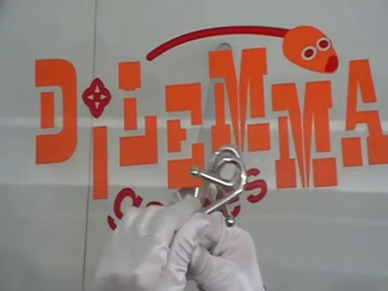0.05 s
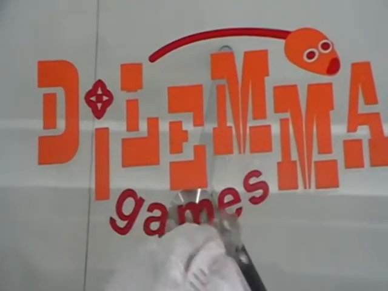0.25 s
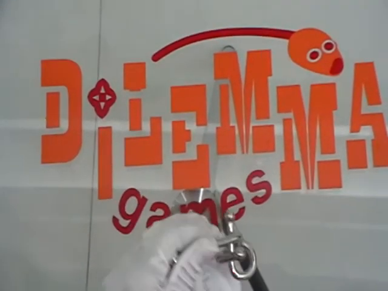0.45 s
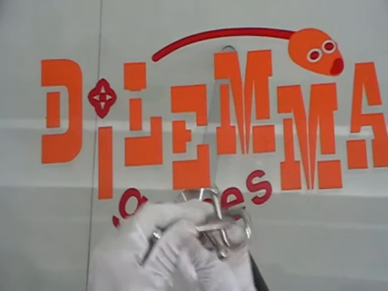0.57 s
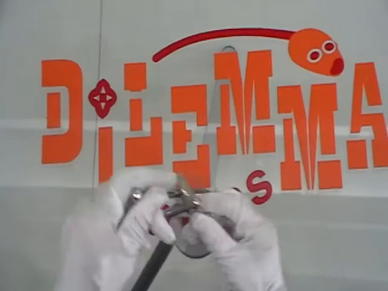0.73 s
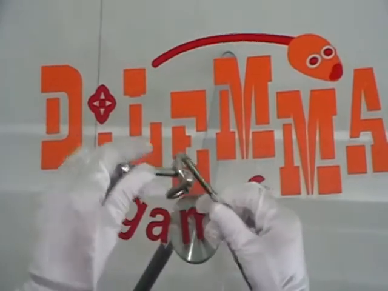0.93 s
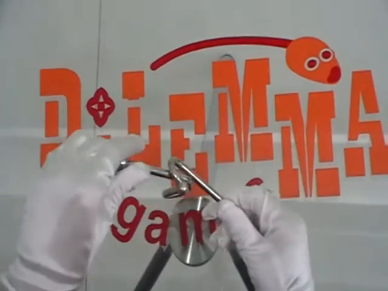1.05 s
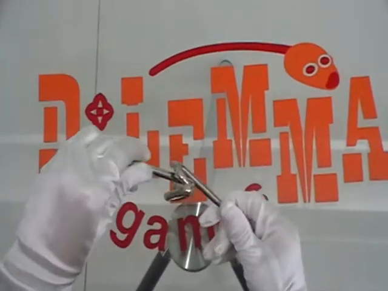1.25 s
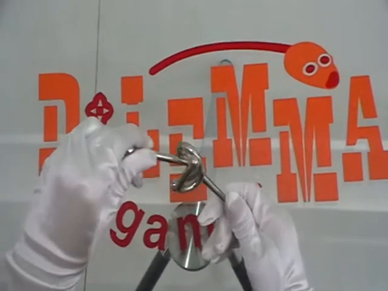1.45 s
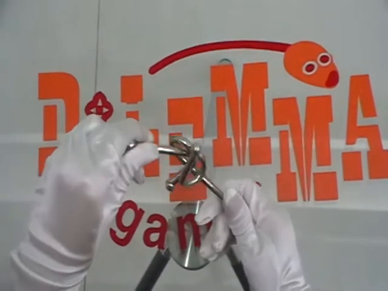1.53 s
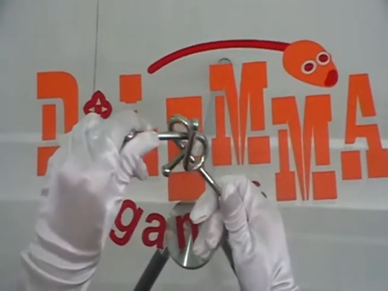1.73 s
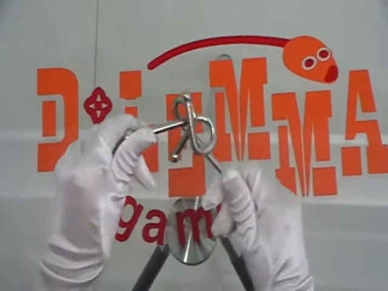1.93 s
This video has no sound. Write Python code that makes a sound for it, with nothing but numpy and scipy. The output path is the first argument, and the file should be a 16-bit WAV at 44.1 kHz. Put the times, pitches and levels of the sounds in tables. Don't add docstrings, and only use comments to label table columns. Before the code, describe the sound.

Two bent steel rods of a puzzle clink in gloved hands: a hard rattling knock, a second slightly softer one, then faint ticks and a soft slide, close stereo microphones, small live room, constant air-conditioner hiss.

```python
import sys
import numpy as np
from scipy import signal
from scipy.io import wavfile
from scipy.ndimage import uniform_filter1d

SR = 44100
rng = np.random.default_rng(int(sys.argv[2]) if len(sys.argv) > 2 else 0)


def wrap_up_sound(samples):
    columns = np.atleast_2d(samples).T
    tamed = np.clip(columns, -1, 1)
    steps = np.round(tamed * 32767).astype(np.int16)
    wavfile.write(sys.argv[1], SR, steps)


def volts(x):
    e = np.asarray(x, float) / 20
    return 10 ** e


N = 88200

# freq [Hz], density [dB per Hz]
AIR_SPECTRUM = [(500, -14), (590, -3), (850, -5), (1100, -8.5), (5000, -26), (8200, -39), (10700, -39),
                (16000, -46.5)]
# freq [Hz], density [dB per Hz]
DRONE_SPECTRUM = [(30, -46.5), (70, -33.5), (100, -6.5), (220, -2.5), (350, -8), (385, -7.5), (450, -10),
                  (500, -24)]
# pitch [Hz], width [Hz], level [dB]
FAN_LINES = [(50.07, 6, -70.5), (84, 8, -70.5), (115.3, 3.2, -61), (144.7, 8, -59), (171.3, 3.5, -59),
             (216.7, 19, -55), (280.3, 39, -55.5), (346, 15, -58.5)]
# freq [Hz], left-right likeness [0-1]
AIR_LIKENESS = [(60, 0.932), (180, 0.95), (550, 0.89), (1650, 0.72), (4970, 0.4), (15000, 0.67)]
# start [s], length [s], level [dB]
SLIDES = [
    (0.135, .06, -76),
    (.6, 0.11, -84),
    (1.43, 0.15, -69),
]
# start [s], force [dB], share of rod B [0-1], tilt [dB per octave], twist [dB]
CONTACTS = [(.1995, -11, 0.25, -4.5, -11), (.202, -11.5, 0.1, 1.5, 5.5), (.2045, -13.5, 0.5, 2, -2),
            (.208, -16, 0.23, -2, -4), (.211, -24.5, 0, 0.5, 3.5), (.2125, -21.5, 0, -2, -1.5),
            (.22, -27, 0, -5, -7), (.2235, -23, 0, -1, -7), (.2275, -16.5, 0.1, -0.5, -4),
            (.2408, -13.5, 0, 1, -2), (.2435, -29.5, .3, -0.5, -3), (0.2438, -30.5, 0.4, -1, -3.5),
            (.2495, -29.5, 0.2, 6.5, -5.5), (.2514, -16.5, 0, 9.5, -4), (.2545, -25, .3, -1, -2),
            (.2585, -24, 0.5, 10, -8), (.263, -15.5, 0.2, 7.5, -14), (0.6163, -57, 0.8, -8, -15),
            (.6995, -52, 0.5, -5, -14), (0.7242, -13.5, 1, 3, -11), (0.731, -22.5, 0.76, 9, -14.5),
            (.7385, -15, .9, -7, -9), (0.7455, -20.5, 0.85, -17, 0), (.7515, -19, 0.55, -7, -13),
            (.7545, -20, 1, 7.5, -2.5), (.759, -28.5, 0.9, 16, -1.5), (.7625, -30, 0.78, 3.5, 12.5),
            (1.164, -53.5, .6, -9, -12), (1.501, -64.5, 0.55, -6.5, -3.5), (1.52, -47, .85, -4, -10.5),
            (1.5805, -52, .8, 3.5, -19.5)]
ROD_A_HZ = [1985, 2950, 3334, 3425, 6471, 6545, 6908, 10375, 10575, 10638, 12453, 12614, 14822, 15105]
ROD_B_HZ = [2032, 2960, 3445, 4650, 6520, 6610, 6875, 10460, 10600, 10860, 12615, 14893, 15174, 15310]
# level [dB], t60 [s]
ROD_A_MODES = [(-19, 0.15), (-23, .15), (-17, .1), (-20, .18), (-8.5, .1), (0, .12), (-1, .12), (4, 0.16),
               (-2, .13), (5, .12), (0, .13), (-3.5, 0.14), (-6.5, .12), (-9, .13)]
# level [dB], t60 [s]
ROD_B_MODES = [(-25, 0.12), (-19.5, 0.32), (-21.5, .16), (-22, .1), (-8, .18), (-1.5, .12), (-10.5, .15),
               (-7, .15), (4, .12), (-13, 0.19), (-6, 0.18), (-5, .14), (-0.5, .1), (-10, .11)]
GRIPS_S = [0.2647, .65, 0.711, 0.76, .8, 1.17, 1.51, 1.53, 1.64]
# freq [Hz], level [dB]
CRACK_SPECTRUM = [(1500, -55.5), (3000, -17), (4300, -19), (5600, -23), (7500, -8), (10000, -14),
                  (12000, -16.5), (16000, -19)]
# start [s], level [dB], low edge [Hz], top edge [Hz], t60 [s]
SNAPS = [(0.2428, -11, 6700, 11000, 0.003), (0.5577, -43, 8500, 15400, .003),
         (.564, -58, 9000, 15500, 0.0036), (.568, -48, 8500, 15540, .003),
         (.5702, -36, 6000, 15740, 0.0032), (0.5739, -42, 7530, 15500, .003),
         (0.7247, -24.5, 3840, 4660, 0.031), (0.7458, -22, 3370, 6500, 0.018),
         (0.7506, -29, 3330, 5000, 0.025), (.759, -33.5, 3830, 6100, 0.023),
         (1.164, -48.5, 4000, 11000, 0.0046), (1.5213, -40, 5920, 12010, .004),
         (1.581, -39, 4000, 12000, .004), (.2408, -18, 10100, 10700, .012),
         (.7246, -32.5, 1950, 2150, 0.075), (0.7264, -12.5, 8050, 15500, 0.0072),
         (.755, -39.5, 9000, 15000, .008), (1.502, -54, 6000, 12500, .004)]
# start [s], length [s], level [dB]
RATTLES = [
    (0.201, 0.031, -24),
    (0.251, 0.014, -28),
    (0.721, 0.014, -44),
    (0.746, 0.033, -33),
]
# freq [Hz], t60 [s]
ROOM_DECAY = [(2000, 0.68), (4000, 0.57), (6500, 0.42), (10000, 0.359), (13000, 0.25), (14600, .27),
              (16000, 0.24)]
# time [s], left over right [dB]
HANDS_LEFT = [(.2, 0), (.26, 1.8), (.72, -0.5), (.75, 0.2), (1.2, 0.5)]

MODE_HZ = np.concatenate([ROD_A_HZ, ROD_B_HZ])
MODE_DB, MODE_T60_S = np.concatenate([ROD_A_MODES, ROD_B_MODES]).T
TWIST_LOW_HZ, TWIST_TOP_HZ = 12000, 13000
PIVOT_HZ = 9000


def evened(x):
    return x / np.sqrt(np.mean(x ** 2) + 1e-20)


def read(points, hz):
    point_hz, value = np.transpose(points)
    return np.interp(np.log(hz + 1), np.log(point_hz + 1), value)


def add(mix, start_s, sound):
    part = mix[round(start_s * SR):][:len(sound)]
    part += sound[:len(part)]


def air_noise(spectrum_db, patchy_db):
    frames, hz = N // 512 + 5, np.fft.rfftfreq(2048, 1 / SR)
    a, b, c, d, patches = rng.standard_normal((frames, 1025, 5)).T
    patches = uniform_filter1d(patches, size=16, axis=0)
    patches = evened(uniform_filter1d(patches, size=8, axis=1))
    same = np.clip(read(AIR_LIKENESS, hz), -1, 1)[:, None]
    left = a + 1j * b
    right = same * left + np.sqrt(1 - same ** 2) * (c + 1j * d)
    z = np.array([left, right]) * volts(spectrum_db(hz)[:, None] + patchy_db * patches)
    return evened(signal.istft(z, nperseg=2048, noverlap=1536)[1][:, :N])


def fan_line(pitch_hz, width_hz, level_db):
    t = np.arange(N) / SR
    r = np.exp(-np.pi * width_hz / SR)
    real, imag = rng.standard_normal((2, N + SR))
    waver = signal.lfilter([1], [1, -2 * r, r * r], real + 1j * imag)[SR:]
    return volts(level_db) * evened((waver * np.exp(2j * np.pi * pitch_hz * t)).real)


def air_conditioner():
    split_hz, left_db = 500, 0.33
    hiss = air_noise(lambda hz: read(AIR_SPECTRUM, hz) - 99 * (hz < split_hz), patchy_db=0.4)
    drone = air_noise(lambda hz: read(DRONE_SPECTRUM, hz) - 99 * (hz >= split_hz), patchy_db=0.67)
    out = volts(-50) * hiss + volts(-48) * drone
    for line in FAN_LINES:
        out += fan_line(*line)
    return out * volts([[left_db / 2], [-left_db / 2]])


def slides():
    slips_per_s, t60_s, edge_db = 780, 0.02, -7
    t, drive = np.arange(N) / SR, np.zeros(N)
    slips = rng.standard_normal(N) * (rng.random(N) < slips_per_s / SR)
    for start_s, length_s, level_db in SLIDES:
        swell = np.sin(np.pi * np.clip((t - start_s) / length_s, 0, 1))
        drive += volts(level_db) * swell * slips
    t = t[:4000]
    db = MODE_DB + edge_db * ((MODE_HZ > TWIST_LOW_HZ) | (MODE_HZ < PIVOT_HZ))
    tones = volts(db[:, None] - 60 * t / t60_s) * np.sin(2 * np.pi * MODE_HZ[:, None] * t)
    return signal.fftconvolve(drive, tones.sum(axis=0))[:N] / 3


def burst(t60_s, spectrum_db, samples):
    t, hz = np.arange(samples) / SR, np.fft.rfftfreq(1024, 1 / SR)
    log_gain = np.log(volts(spectrum_db(hz)))
    full = np.concatenate([log_gain, log_gain[-2:0:-1]])
    taps = np.fft.ifft(np.exp(np.conj(signal.hilbert(full)))).real[:512]
    source = (rng.standard_normal(samples) + 6 * (t == 0)) * volts(-60 * t / t60_s)
    out = signal.fftconvolve(source, taps)
    return out / abs(out).max()


def crack_db(hz):
    return read(CRACK_SPECTRUM, hz)


def clink(start_s, force_db, share_b, tilt_db, twist_db):
    low_hz, low_rise_s, contact_s = 5500, .004, .0003
    high_detune, low_detune, spot_db = .001, 0.011, 2.5
    touch_loss_db, low_touch_loss_db, grip_t60_s = 3, .6, 0.014
    dull_db_per_db, hard_db = .4, -21.5
    high = MODE_HZ > low_hz
    spot, side, detune = rng.standard_normal((3, len(MODE_HZ)))
    share_b = np.clip(share_b, 0, 1)
    weight = np.repeat([np.sqrt(1 - share_b), np.sqrt(share_b)], len(ROD_A_MODES)) * np.sign(side)

    db = MODE_DB + spot_db * spot + tilt_db * np.log2(MODE_HZ / PIVOT_HZ) * high
    db = db + twist_db * (MODE_HZ > TWIST_LOW_HZ) * (MODE_HZ < TWIST_TOP_HZ)
    db = db + dull_db_per_db * min(force_db - hard_db, 0) * (MODE_HZ > TWIST_TOP_HZ)
    hz = MODE_HZ * (1 + np.where(high, high_detune, low_detune) * detune)
    t = np.arange(SR // 5) / SR
    tones = volts(db[:, None] - 60 * t / MODE_T60_S[:, None]) * np.sin(2 * np.pi * hz[:, None] * t)

    touches = sum(np.clip((start_s + t - row[0]) / .001, 0, 1) for row in CONTACTS if row[0] > start_s)
    grip_s = min(g for g in GRIPS_S if g > start_s)
    gripped_s = np.maximum(start_s + t - grip_s, 0)
    high_gain = np.minimum(t / contact_s, 1) * volts(-touch_loss_db * touches - 60 * gripped_s / grip_t60_s)
    low_gain = np.minimum(t / low_rise_s, 1) * volts(-low_touch_loss_db * touches)
    ring = (high_gain * ((weight * high) @ tones) + low_gain * ((weight * ~high) @ tones)) / 3
    add(ring, 0, volts(-7) * burst(.003, crack_db, 800))
    return volts(force_db) * ring


def rattles():
    cracks_per_s, spread_db, fade_db = 1600, 4, 4.7
    t, drive = np.arange(N) / SR, np.zeros(N)
    size = volts(spread_db * np.minimum(rng.exponential(1, N), 4))
    size *= (rng.random(N) < cracks_per_s / SR) * rng.choice([-1., 1.], N)
    for start_s, length_s, level_db in RATTLES:
        on = (t > start_s) * (t < start_s + length_s)
        drive += volts(level_db - fade_db * (t - start_s) / length_s * on) * on * size
    return signal.fftconvolve(drive, burst(0.00042, crack_db, 200))[:N]


def snap(level_db, low_hz, top_hz, t60_s):
    def band_db(hz):
        outside = np.maximum(low_hz / (hz + 50), (hz + 50) / top_hz)
        return -36 * np.maximum(np.log2(outside), 0)
    return volts(level_db) * burst(t60_s, band_db, 1500)


def puzzle():
    out = slides()
    for row in CONTACTS:
        add(out, row[0], clink(*row))
    out += rattles()
    for start_s, *settings in SNAPS:
        add(out, start_s, snap(*settings))
    return signal.sosfilt(signal.butter(4, 1850, "high", fs=SR, output="sos"), out)


def room(x):
    start_s, spacing = .003, 12
    taps = np.zeros(SR)
    at = np.arange(round(start_s * SR), SR - spacing, spacing)
    at = at + rng.integers(0, spacing, len(at))
    taps[at] = rng.choice([-1., 1.], len(at))
    hz, t, z = signal.stft(taps, SR, nperseg=128)
    tail = signal.istft(z * volts(-60 * t / read(ROOM_DECAY, hz)[:, None]), SR, nperseg=128)[1]
    return signal.fftconvolve(x, tail / np.linalg.norm(tail))[:N]


def scene():
    air = air_conditioner()
    metal = puzzle()
    port_lag = .34
    direct = metal + port_lag * np.gradient(metal) * np.array([[1], [-1]])
    left_db = np.interp(np.arange(N) / SR, *np.transpose(HANDS_LEFT))
    return (direct + volts(-6.5) * room(metal)) * volts([left_db / 2, -left_db / 2]) + air


def top_cut(x):
    return signal.sosfilt(signal.butter(12, 16880, fs=SR, output="sos"), x)


def record(dry):
    low_pass = signal.firwin(901, 15800, window=("kaiser", 8), fs=SR)
    limited = signal.oaconvolve(dry, low_pass[None], "same")
    return top_cut(limited)


dry = scene()
out = record(dry)
wrap_up_sound(out)
```